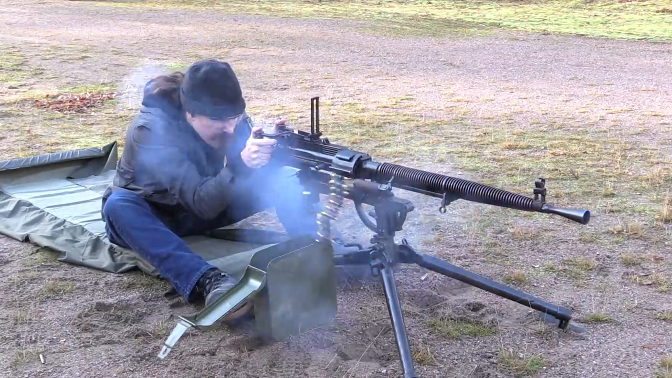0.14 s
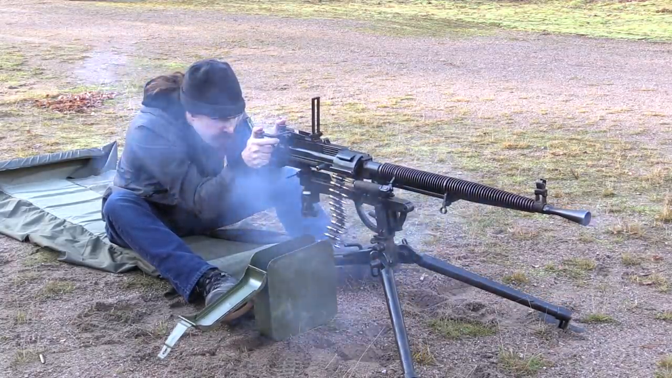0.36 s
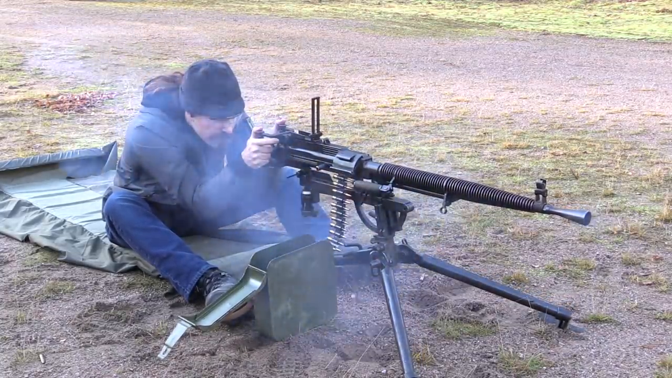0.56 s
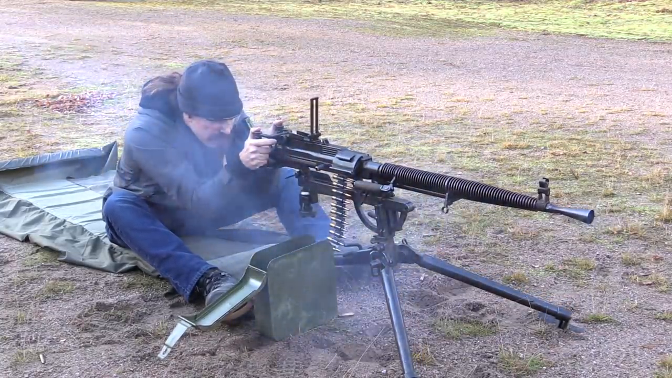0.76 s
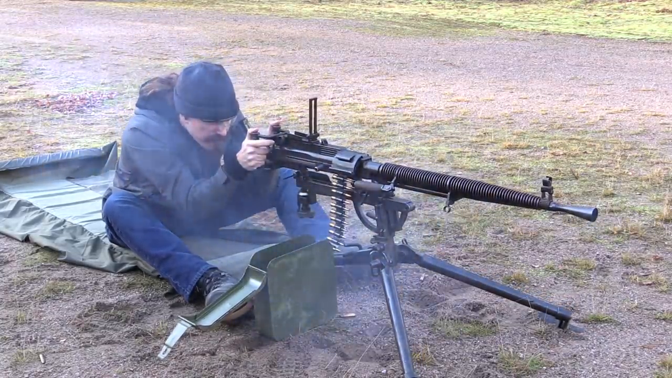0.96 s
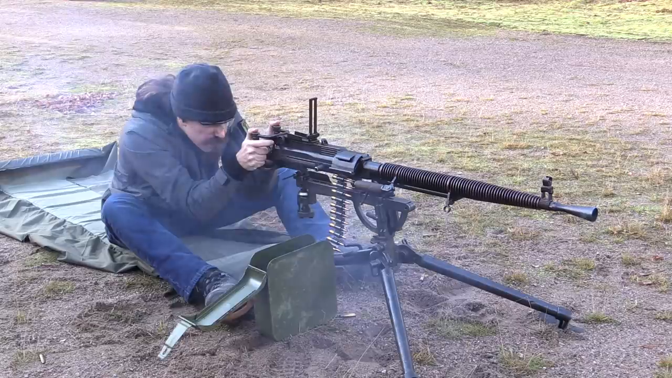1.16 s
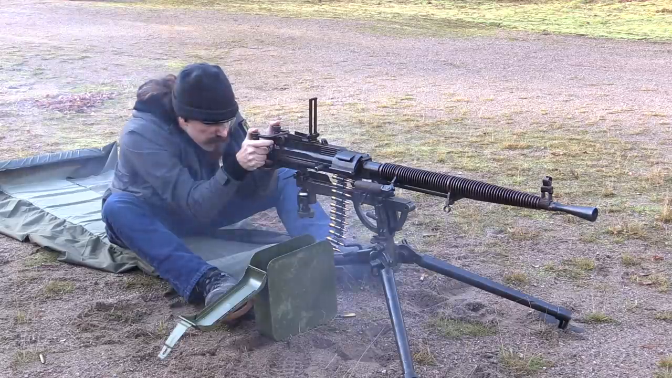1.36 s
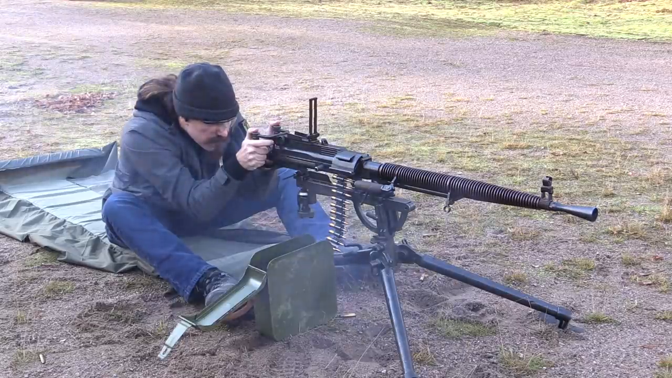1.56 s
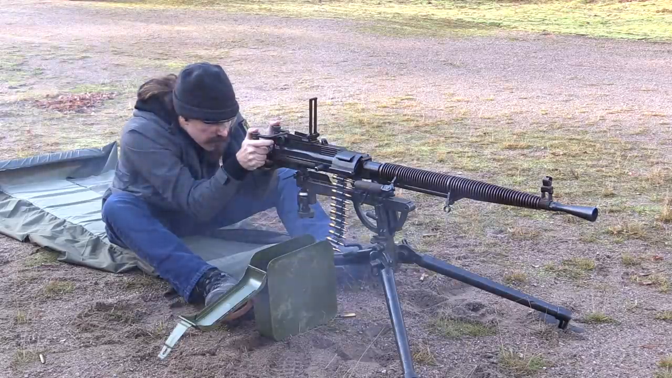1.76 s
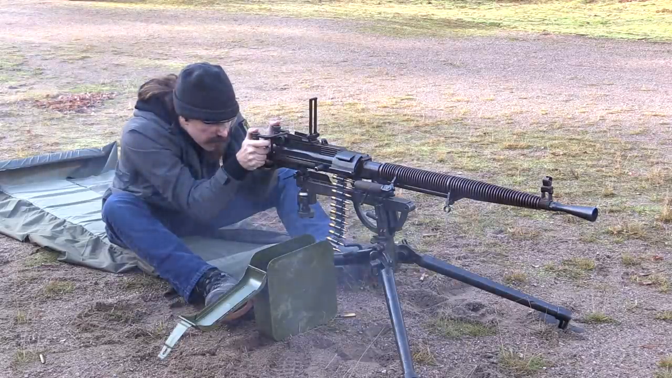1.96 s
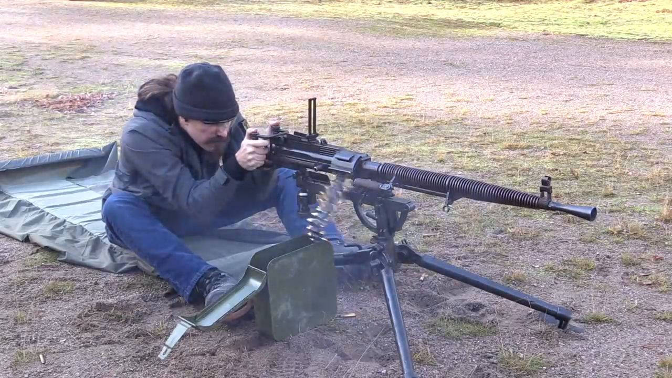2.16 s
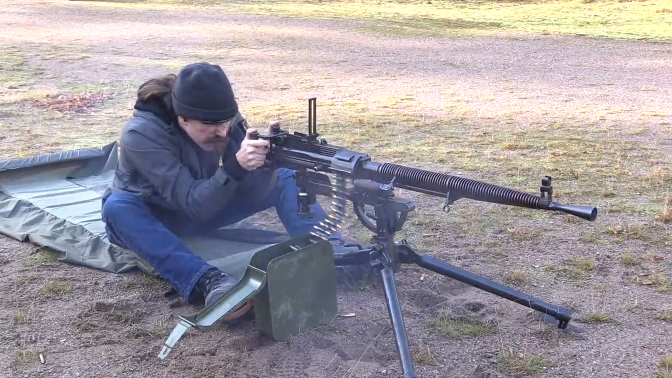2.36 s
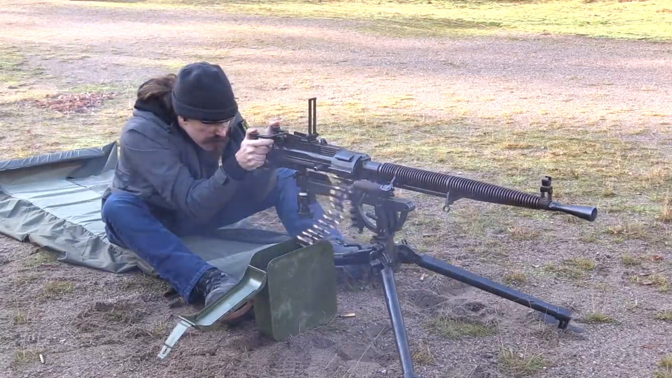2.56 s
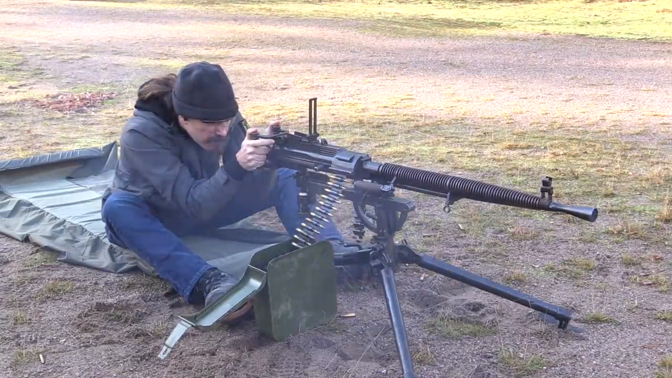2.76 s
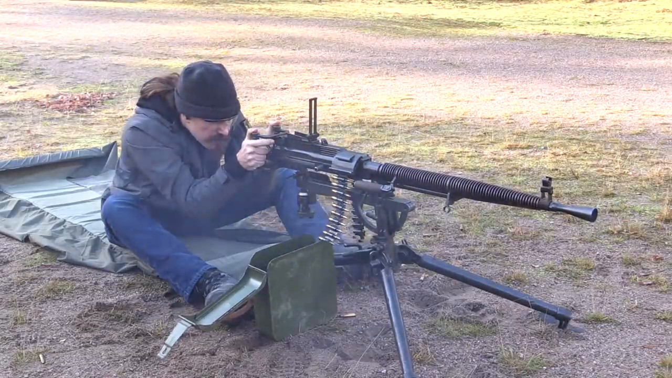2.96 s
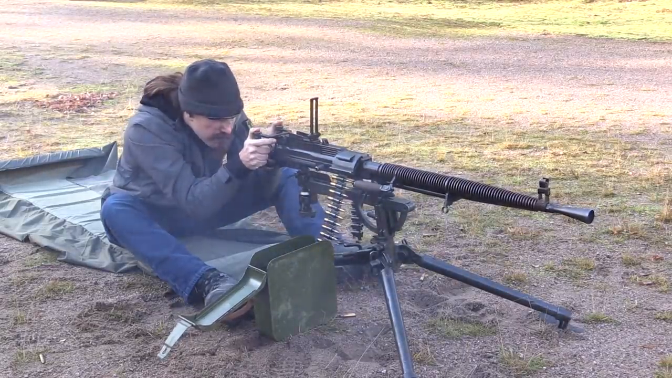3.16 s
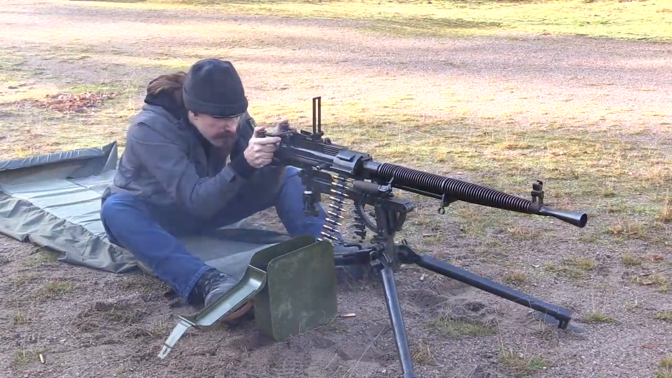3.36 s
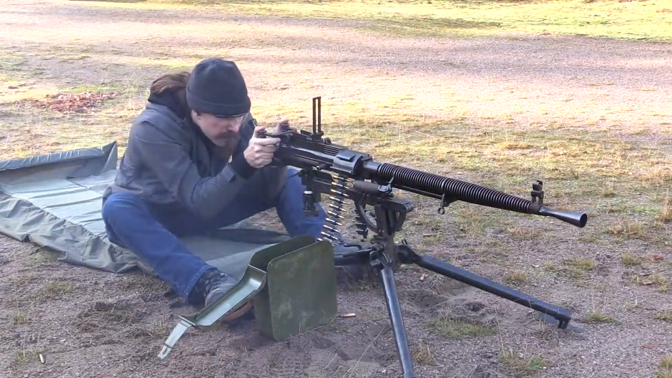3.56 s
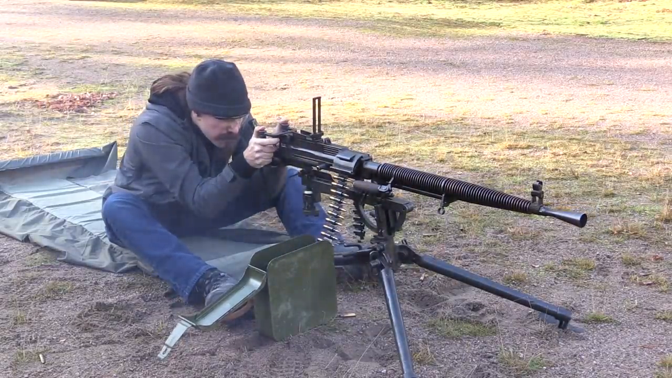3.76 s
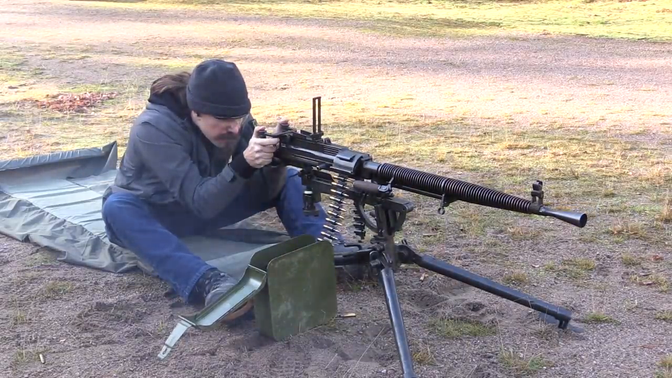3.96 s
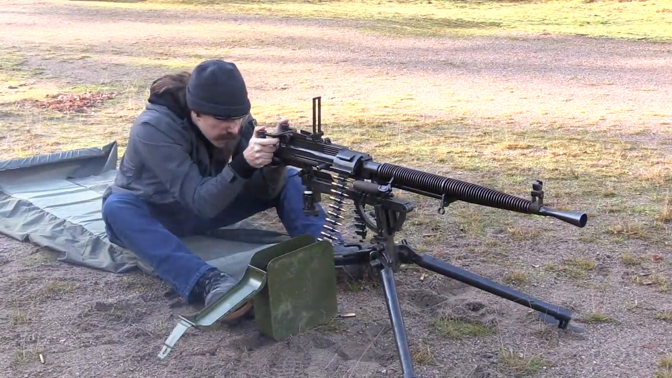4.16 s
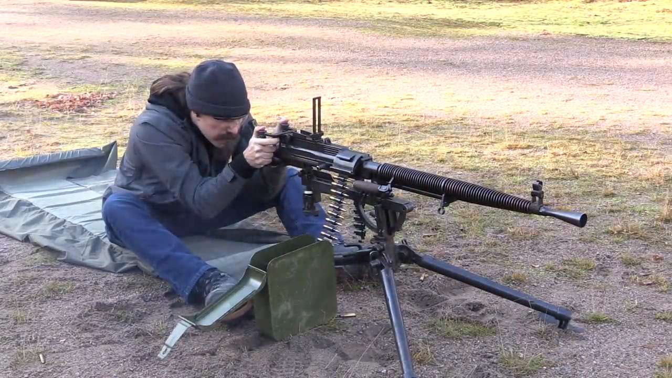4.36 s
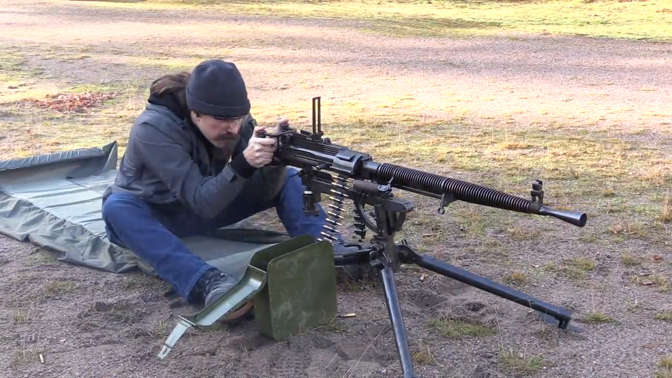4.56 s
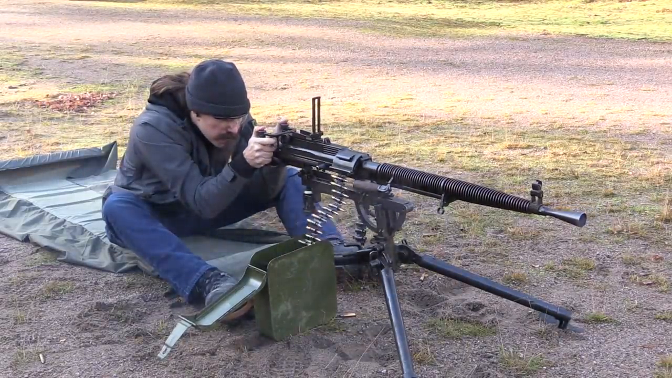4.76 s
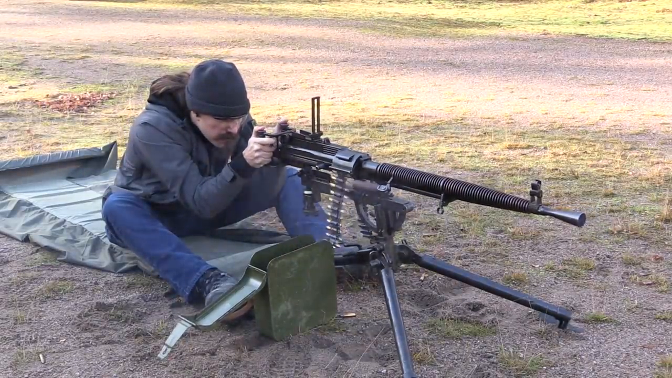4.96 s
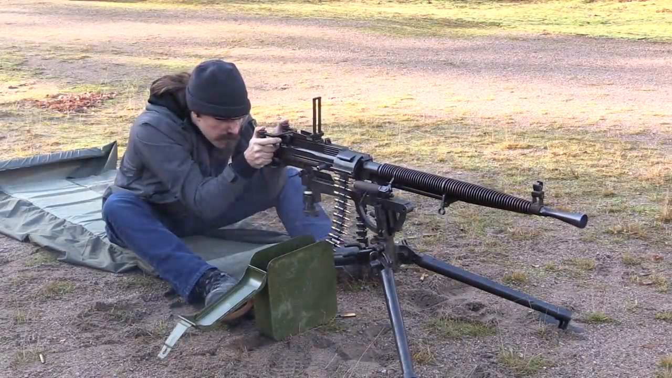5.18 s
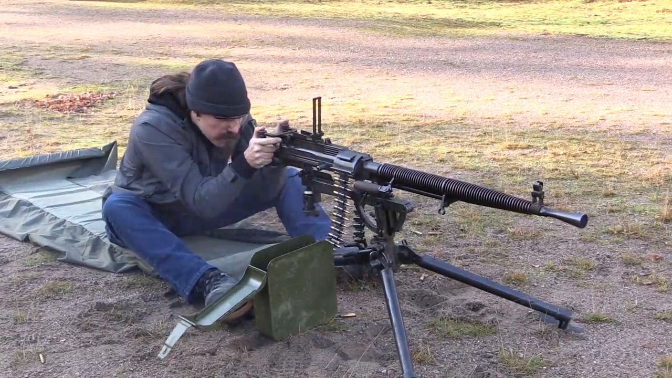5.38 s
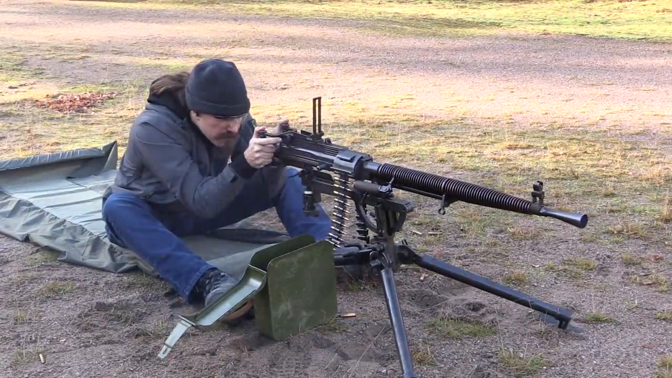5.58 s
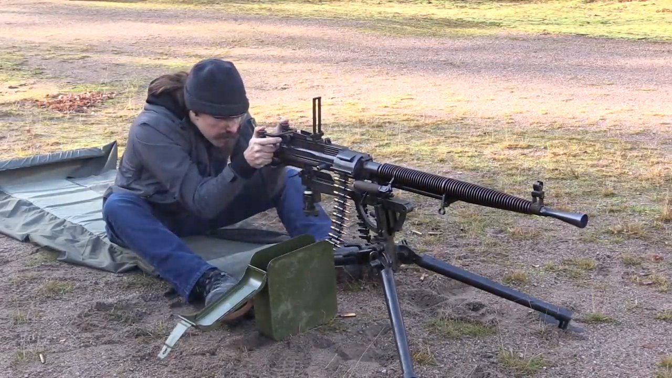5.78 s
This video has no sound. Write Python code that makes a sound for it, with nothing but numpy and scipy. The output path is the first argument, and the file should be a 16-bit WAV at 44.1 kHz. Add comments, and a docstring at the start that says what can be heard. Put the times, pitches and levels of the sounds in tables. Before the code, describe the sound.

A belt-fed heavy machine gun fires three short bursts at an outdoor range, the first already under way. Each rapid, cracking shot overloads a microphone a few steps away. After each burst the bullets hiss off, one swishes faintly from the ground, and a dull echo rolls back and fades. The bolt clacks forward just before the second and third bursts. The gun's steel rings thinly and spent cases clink as they land.

```python
"""A belt-fed heavy machine gun on a tripod fires three short bursts on an outdoor range.
The bolt (the sliding block that loads each round) runs forward, then each blast of gas from the barrel
overloads the microphone. Bullets hiss away and a few swish off the ground. Dull echoes come back from
banks and trees, the gun's steel rings on, and spent cases clink as they land."""
import sys
import numpy as np
from scipy import signal
from scipy.io import wavfile

SR = 44100
rng = np.random.default_rng(int(sys.argv[2]) if len(sys.argv) > 2 else 0)


def int16_out(signal):
    """Quantize to a 16-bit WAV file."""
    q = np.round(np.clip(np.atleast_2d(signal).T, -1, 1) * 32767)
    wavfile.write(sys.argv[1], SR, q.astype(np.int16))


N = 256645


def from_db(db):
    """Turn decibels into a gain to multiply by."""
    return 10 ** (np.asarray(db) / 20)


def at_hz(table, hz):
    """Read a table at any pitch, sliding smoothly between its rows."""
    pitches, values = np.array(table).T
    return np.interp(np.log(hz), np.log(pitches), values)


def filtered(x, hz, kind, order=2):
    """Keep the low part, the high part or one band of a sound."""
    return signal.sosfilt(signal.butter(order, np.clip(hz, 10, .45 * SR), kind, fs=SR, output="sos"), x)


def add(out, sound, start_s):
    """Mix a sound in at a time, dropping what lies outside."""
    at = int(round(start_s * SR))
    low, high = max(at, 0), min(at + len(sound), len(out))
    if high > low:
        out[low:high] += sound[low - at:high - at]


def bands(size, count):
    """Slice white noise into bands from bass to treble; give each one's middle pitch and sound."""
    white = rng.standard_normal((2, size)) * np.sqrt(SR / 2000)   # a power of one per kHz
    edges = np.linspace(25 ** .25, 17000 ** .25, count + 1) ** 4
    for k, (low, high) in enumerate(zip(edges, edges[1:])):
        yield np.sqrt(low * high), filtered(white[k % 2], [low, high], "band", order=4)


def noise(tone, size, fades=None):
    """Noise shaped by a tone table. Fade times, if given, say how long each band takes to drop 60 dB."""
    t = np.arange(size) / SR
    out = np.zeros(size)
    for hz, band in bands(size, count=22):
        fade = 1 if fades is None else from_db(-60 * t / at_hz(fades, hz))
        out += from_db(at_hz(tone, hz)) * band * fade
    return out


def swell(t, start, end, rise, fall):
    """A loudness curve that rises, stays full from start to end, then falls; all in seconds."""
    return np.exp(np.minimum(t - start, 0) / rise - np.maximum(t - end, 0) / fall)


def ring(notes, size, spread_db):
    """One blow on metal: several fading notes, each a little louder or softer by chance."""
    t = np.arange(size) / SR
    return sum(from_db(db + spread_db * rng.standard_normal() - 60 * t / fade_s)
               * np.sin(2 * np.pi * hz * t) for hz, db, fade_s in notes)


# The tone of still air: pitch_hz, level_db
AIR_TONE = [(30, -59.5), (80, -66.5), (150, -61.5), (450, -50.5), (1500, -59.5), (3000, -74.5),
            (6000, -95.5), (15000, -108)]

def still_air():
    """The open air makes a faint, steady hush."""
    return noise(AIR_TONE, N)


# Strong echoes from down the range: delay_s, level_db
STRONG_ECHOES = [(0.4105, -13), (0.457, -11), (.597, -14)]
# The blast scattered by nearby ground and trees: pitch_hz, level_db
SCATTER_TONE = [(100, -22), (200, -10), (380, -8), (540, -2), (750, -19.5), (1050, -10.5), (1500, -12),
                (4000, -25), (12000, -59.5)]
# The far rolling echo: pitch_hz, level_db
ROLL_TONE = [(40, -53), (90, -47), (170, -35.5), (280, -30.5), (430, -28), (620, -36.5), (950, -36.5),
             (1450, -30.5), (2000, -34.5), (3100, -42.5), (5300, -50.5), (7500, -61.5), (10000, -70.5)]
# How long that roll takes to die away: pitch_hz, fade_s
ROLL_FADES = [(100, 3.2), (600, 3.82), (1600, 2.99), (3100, 3.18), (5300, 2), (10000, 0.91)]

def echoes(weak_count=60):
    """Each shot bounces back the same way: near scatter, thuds from banks and trees, a long far roll."""
    lead_s = .02   # the echo's clock starts this long before the shot
    t = np.arange(int(2.7 * SR)) / SR - lead_s
    bounces = np.zeros(len(t))
    for delay_s, db in STRONG_ECHOES:
        arrival_s = lead_s + delay_s - .002   # the thud needs a moment to peak
        add(bounces, [from_db(db)], arrival_s)
        add(bounces, [from_db(db - 7.5)], arrival_s + .015)   # a second, slightly longer path
    distances = (np.arange(weak_count) + rng.random(weak_count)) / weak_count   # 0 near, 1 far
    for distance, sign in zip(distances, rng.choice([-1, 1], weak_count)):
        add(bounces, [sign * from_db(-23 - 11 * distance)], lead_s + .054 + .51 * distance)
    thud = filtered(signal.unit_impulse(SR // 20), [138, 340], "band", order=3)
    echo = signal.fftconvolve(bounces, thud / np.abs(thud).max())[:len(t)]   # one thud per bounce
    echo[:SR] += noise(SCATTER_TONE, SR) * swell(t[:SR], .0948, .083, rise=.012, fall=.067)
    echo += noise(ROLL_TONE, len(t), ROLL_FADES) * swell(t, .45, 1.6, rise=.06, fall=.15)
    out = np.zeros(N)
    for start_s, *_ in shots():
        add(out, echo, start_s - lead_s)
    return out


# Bullets glancing off the ground: start_s, end_s, level_db
GLANCES = [(.82, 1.125, -39), (3.15, 3.327, -46), (5.5, 5.683, -40)]

def ricochets(end_hz=2130, climb_octaves_per_s=.69):
    """A tumbling bullet swishes: a band of noise that climbs and narrows, then stops."""
    out = np.zeros(N)
    for start_s, end_s, db in GLANCES:
        t = np.arange(start_s - .3, end_s + .3, 1 / SR)
        left_s = np.maximum(end_s - t, 0)
        centre = np.log2(end_hz) - climb_octaves_per_s * left_s
        width_octaves = .34 + .6 * left_s
        swish = sum(band * np.exp(-.5 * ((np.log2(hz) - centre) / width_octaves) ** 2)
                    for hz, band in bands(len(t), count=20))
        add(out, from_db(db) * swish * swell(t, start_s, end_s, rise=.06, fall=.048), t[0])
    return out


# The hiss of a flying bullet: pitch_hz, level_db
HISS_TONE = [(60, -35.5), (170, -12.5), (400, -5), (620, -15), (900, -14.5), (1200, -15), (1480, -7.5),
             (1900, -12), (2500, -12), (3400, -16), (5300, -17.5), (9000, -24.5), (14000, -39)]
# Air soaks up the treble first: pitch_hz, fade_s
HISS_FADES = [(150, 7), (700, 6.1), (1600, 4), (3100, 3.73), (5300, 2.22), (7500, 1.56), (10000, 1.4),
              (14000, 0.56)]
# How long each band of the hiss lasts: pitch_hz, share_of_flight
HISS_LENGTHS = [(150, 0.75), (900, 0.69), (1400, 0.76), (2300, 0.91), (3500, 1.1), (5500, 0.95), (9000, .5)]

def bullet_hiss(patchy_db=2, patch_s=.02, near_s=.069):
    """Each bullet's shock wave scatters off uneven ground; the hiss narrows as the bullet lands."""
    step = 64   # samples between loudness updates
    out, t = np.zeros(N), np.arange(0, N, step) / SR
    start_s, _, db, flight_s = np.array(shots()).T[:, :, None]
    age_s = t - start_s   # one row per bullet
    flown_s = np.maximum(age_s, 0)
    distance_gain = from_db(db) / (1 + flown_s / near_s)
    patches = np.arange(0, N / SR + 1, patch_s)
    for hz, band in bands(N, count=24):
        tone_gain = from_db(at_hz(HISS_TONE, hz) - 60 * flown_s / at_hz(HISS_FADES, hz))
        in_flight = swell(age_s, .085, flight_s * at_hz(HISS_LENGTHS, hz), rise=.0211, fall=.2)
        all_bullets = np.sqrt(((distance_gain * tone_gain * in_flight) ** 2).sum(0))   # powers add up
        bumps = rng.standard_normal(len(t))[:len(patches)]
        ground_gain = from_db(patchy_db * np.interp(t, patches, bumps))
        out += band * np.repeat(ground_gain * all_bullets, step)[:N]
    return out


# The notes of a spent brass case: pitch_hz, level_db, fade_s
CASE_NOTES = [(4813, 3, 0.4), (4872, -4, 0.38), (5222, -8, 0.33), (5700, 1.5, 0.16), (7380, -0.5, 0.12),
              (9450, -2.5, 0.14), (10100, -4, 0.061), (10750, -18, .04), (12300, -8, .04),
              (13700, -7, 0.16), (15500, -12, .04)]
# Cases and belt links landing: start_s, level_db, low_cut_hz
LANDINGS = [(.563, -37, 9400), (.728, -36, 14000), (2.806, -26, 9170), (3.025, -46, 10150),
            (3.096, -31, 4854), (3.657, -53.5, 9500), (5.325, -31, 12900)]

def case_clinks():
    """Spent cases and belt links ring briefly as they hit the ground."""
    out = np.zeros(N)
    for start_s, db, low_cut_hz in LANDINGS:
        clink = ring(CASE_NOTES, SR // 2, spread_db=1.5)
        add(out, from_db(db) * filtered(clink, low_cut_hz, "high", order=4), start_s)
    return out


# The notes of the gun's steel: pitch_hz, level_db, fade_s
STEEL_NOTES = [(9125, -36, 1.4), (10131, -43, 1.35), (10160, -48, 1.0), (10314, -42, .85),
               (10858, -43, 1.3), (10885, -49, 1.1), (12200, -52, 1.1), (13600, -38, .65),
               (14250, -52, 1.2)]
# The bolt slams onto its catch after a burst: start_s, level_db, hardest_struck_hz
BOLT_SLAMS = [(.253, 4.5, 9750), (2.714, -1, 9450), (5.026, 9.5, 11580)]

def steel_ring(drop_db_per_khz=7.5):
    """The steel rings once the bolt has stopped; notes far from the struck pitch get less of the blow."""
    out = np.zeros(N)
    for start_s, slam_db, struck_hz in BOLT_SLAMS:
        notes = [(hz, db - drop_db_per_khz * abs(hz - struck_hz) / 1000, fade_s)
                 for hz, db, fade_s in STEEL_NOTES]
        add(out, from_db(slam_db) * ring(notes, 2 * SR, spread_db=2), start_s)
    return out


# The gun's sliding parts: pitch_hz, level_db
BOLT_TONE = [(100, -25.5), (550, -21.5), (950, -13), (1500, -1), (3000, -2), (4500, -4.5), (8000, -8),
             (15000, -17.5)]
# The bolt runs forward before a burst: start_s, end_s, starting_level_db
BOLT_SLIDES = [(2.0137, 2.099, -34), (4.551, 4.604, -37)]
# The bolt and belt knock on the way: start_s, level_db
BOLT_KNOCKS = [(2.0395, -20), (2.059, -32), (2.0668, -25), (4.5752, -21), (4.585, -32)]

def bolt_run(speed_up_db=6):
    """The bolt gathers speed, dragging the belt and knocking a round into the barrel."""
    t = np.arange(N) / SR
    force = np.zeros(N)
    for start_s, end_s, db in BOLT_SLIDES:
        progress = np.clip((t - start_s) / (end_s - start_s), 0, 1)
        sliding = swell(t, start_s, end_s, rise=.00096, fall=.01)
        force += from_db(db + speed_up_db * progress ** 2) * sliding
    for start_s, db in BOLT_KNOCKS:
        force += from_db(db) * swell(t, start_s, start_s + .001, rise=.0003, fall=.0016)
    return force * noise(BOLT_TONE, N)


# Bursts of fire, the first already under way when the sound begins:
# first_shot_s, last_shot_s, blast_db, hiss_db, last_bullet_flight_s
FIRE_BURSTS = [(-.156, .169, -3, 2, 0.86), (2.085, 2.628, -3.5, 1.7, 0.7), (4.621, 4.938, -1, 2.7, .8)]

def shots(cycle_s=.108, first_shot_boost_db=1):
    """The gun fires about nine times a second. Each row: start_s, blast_db, hiss_db, flight_s."""
    rows = []
    for first_s, last_s, blast_db, hiss_db, flight_s in FIRE_BURSTS:
        cycles = round((last_s - first_s) / cycle_s)
        for k, start_s in enumerate(np.linspace(first_s, last_s, cycles + 1)):
            early_s = .003 * np.sin(np.pi * k / cycles)   # the gun gathers pace, then slackens
            boost_db = first_shot_boost_db * (k == 0)
            extra_flight_s = .025 * (cycles - k)   # earlier bullets fly longer
            rows.append((start_s - early_s, blast_db + boost_db, hiss_db, flight_s + extra_flight_s))
    return rows


# The bright crack of a shot: pitch_hz, level_db
CRACK_TONE = [(100, -22), (500, -7.5), (1500, -4.5), (4000, -6), (8000, -12.5), (15000, -17)]
# The roar of gas leaving the barrel: pitch_hz, level_db
ROAR_TONE = [(40, -44.5), (120, -8.5), (250, -9), (500, 6), (900, -13.5), (1600, -3), (3500, -15),
             (7000, -16), (15000, -35)]

def gun_blasts():
    """Each shot is a bright crack, a roar of gas, a slow push of air and the clatter of the bolt."""
    out, rows = np.zeros(N), shots()
    t = np.arange(SR // 5) / SR - .02   # zero is the moment of the shot
    cracks, roars, clatters = (noise(tone, len(t) * len(rows)).reshape(len(rows), -1)
                               for tone in (CRACK_TONE, ROAR_TONE, BOLT_TONE))
    push = from_db(-9.5) * swell(t, .016, .02, rise=.0035, fall=.0064)   # presses the microphone one way
    for (start_s, db, _, _), crack, roar, clatter in zip(rows, cracks, roars, clatters):
        blast = crack * swell(t, -.001, .004, rise=.003, fall=.009)
        blast += roar * swell(t, .015, .042, rise=.0033, fall=.0044)
        blast += from_db(-18) * clatter * swell(t, .072, .099, rise=.011, fall=.021)
        add(out, from_db(db) * (blast + push), start_s + t[0])
    return out


def scene():
    """The gun, its bullets and their echoes, heard in one channel from a few steps away."""
    firing = gun_blasts() + bullet_hiss() + ricochets() + echoes()
    metal = bolt_run() + steel_ring() + case_clinks()
    return (firing + metal + still_air())[None]


def record(dry, ceiling_db=-12, low_cut_hz=85, soften_hz=12000, top_cut_hz=15800):
    """The microphone overloads and flattens the loud peaks; then deep bass and high treble are cut."""
    clipped = dry / (1 + (dry / from_db(ceiling_db)) ** 6) ** (1 / 6)
    thinned = filtered(clipped, low_cut_hz, "high", order=3)
    softened = filtered(thinned, soften_hz, "low", order=1)
    steep_cut = signal.ellip(12, .1, 90, top_cut_hz, fs=SR, output="sos")
    return signal.sosfilt(steep_cut, softened)


dry = scene()
out = record(dry)
int16_out(out)
```